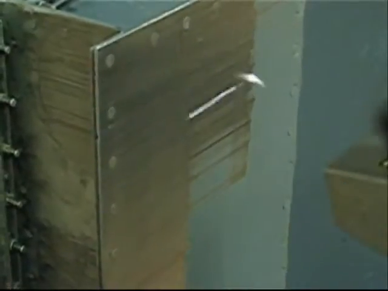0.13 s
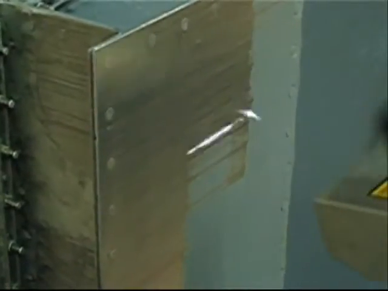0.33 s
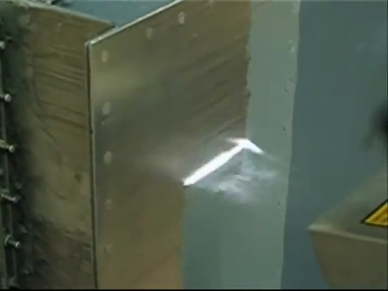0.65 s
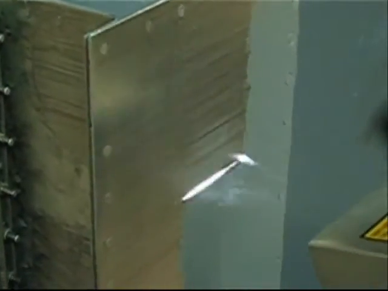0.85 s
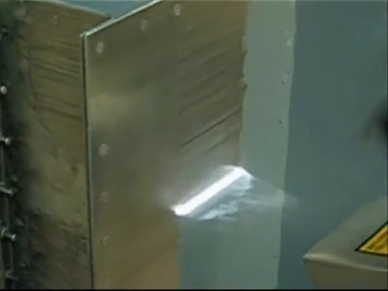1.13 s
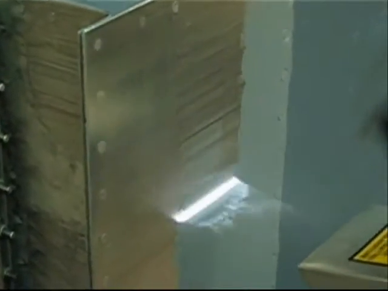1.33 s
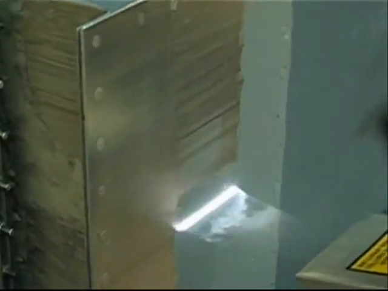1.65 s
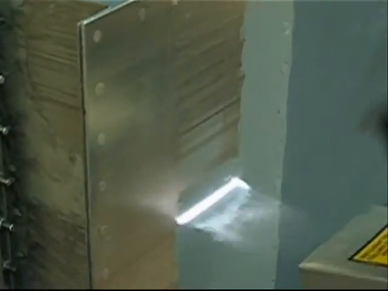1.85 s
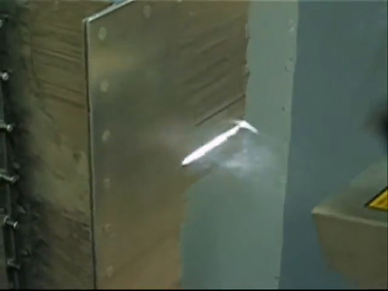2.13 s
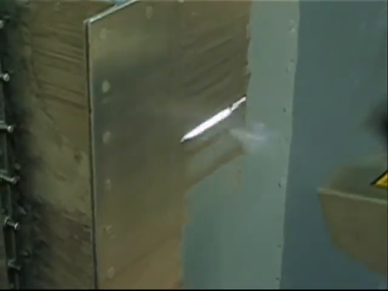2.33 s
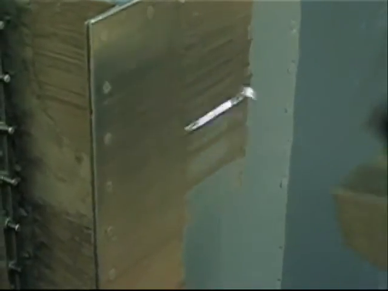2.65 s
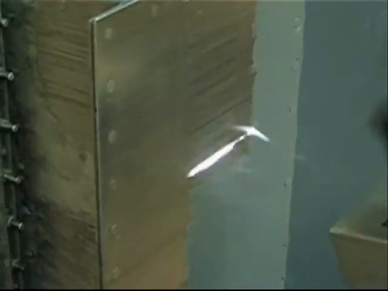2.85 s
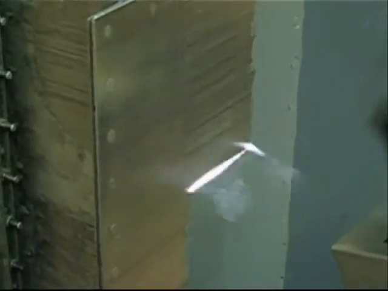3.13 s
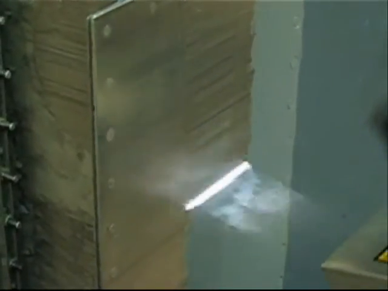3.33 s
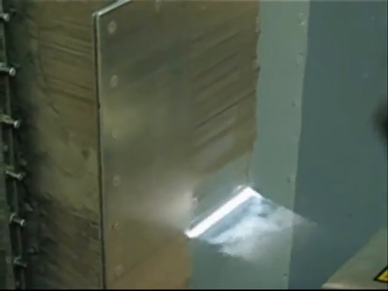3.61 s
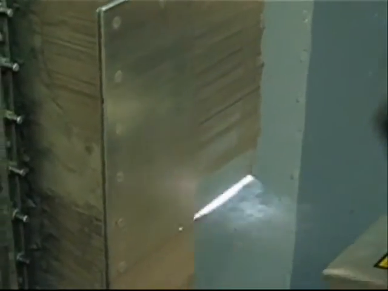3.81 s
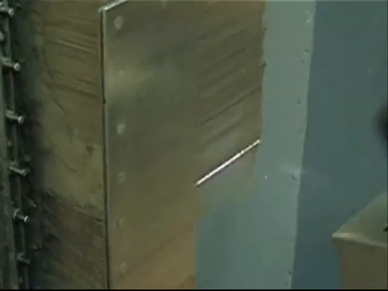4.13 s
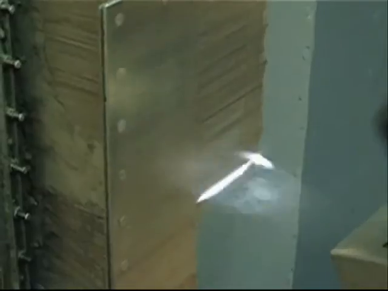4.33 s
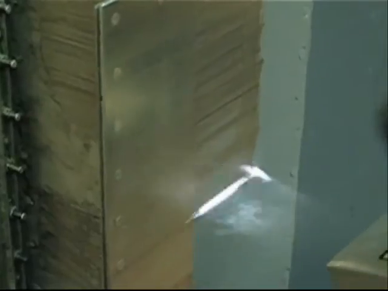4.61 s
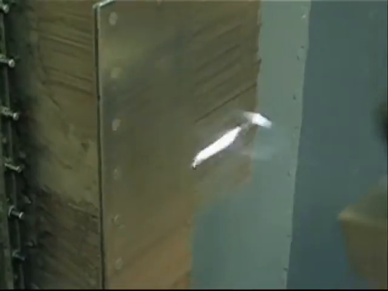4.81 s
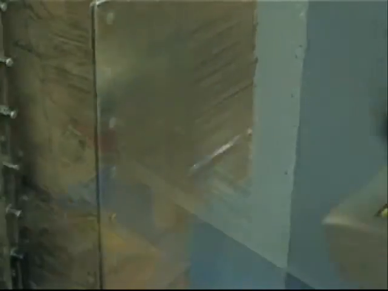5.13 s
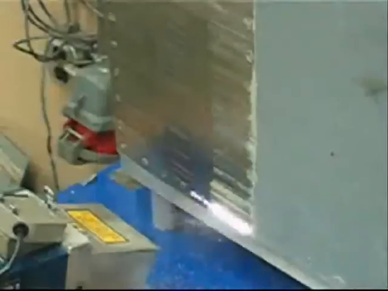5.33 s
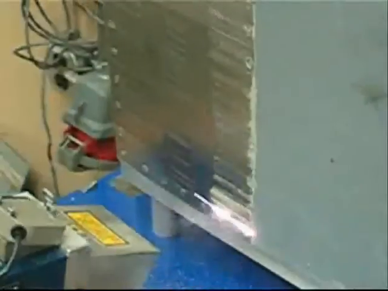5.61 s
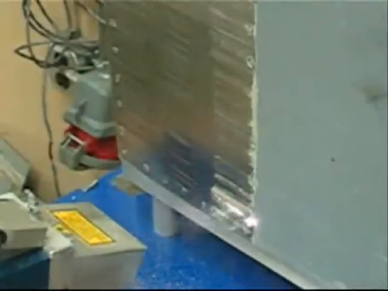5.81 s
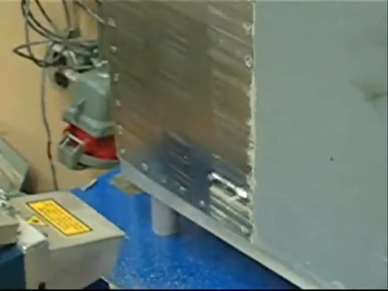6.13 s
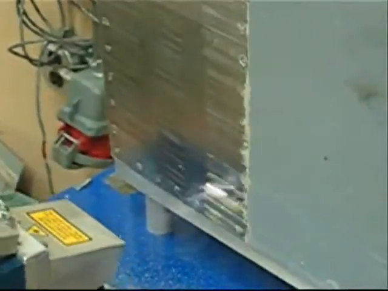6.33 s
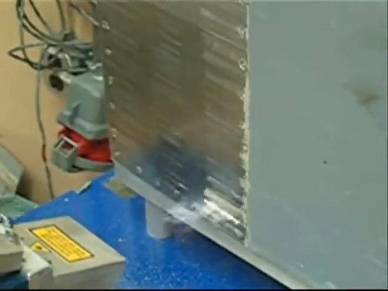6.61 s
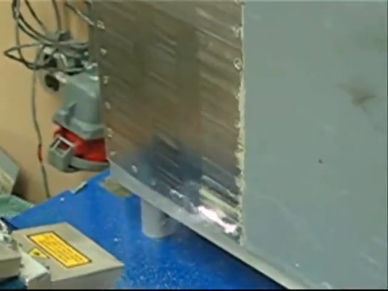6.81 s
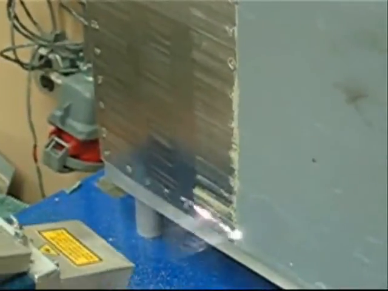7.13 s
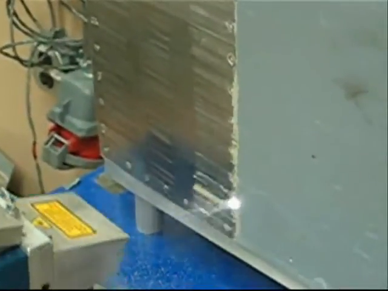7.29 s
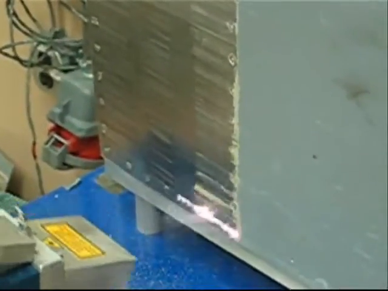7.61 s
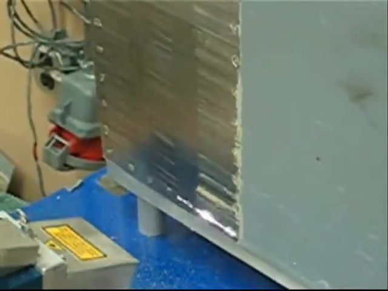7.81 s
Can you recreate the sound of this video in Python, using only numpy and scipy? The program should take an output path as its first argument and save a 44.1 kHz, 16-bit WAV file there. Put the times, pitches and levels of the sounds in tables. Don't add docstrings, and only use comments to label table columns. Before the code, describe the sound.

A fume extractor roars and whistles steadily over a low motor hum while a laser crackles on metal, then wind buffets the microphone.

```python
import sys
import numpy as np
from scipy import signal
from scipy.fft import rfft, irfft, next_fast_len
from scipy.io import wavfile
from scipy.ndimage import uniform_filter1d

SR = 44100
rng = np.random.default_rng(int(sys.argv[2]) if len(sys.argv) > 2 else 0)


def log_audio(samples):
    frames = np.atleast_2d(samples).T
    limited = np.clip(frames, -1, 1)
    pcm = np.round(limited * 32767).astype(np.int16)
    wavfile.write(sys.argv[1], SR, pcm)


def how_loud(loudness_db):
    steps = np.asarray(loudness_db, float) / 20
    return 10 ** steps


N = 351036
SIZE = next_fast_len(N)
HZ = np.maximum(np.fft.rfftfreq(SIZE, 1 / SR), 1)
HOLD = 4
TOP_HZ = SR / HOLD / 2

# t/s, peak level/dB, f/Hz
EDDIES = [(5.508, -14, 299), (5.54, -16, 315), (5.685, -16, 202), (5.725, -12, 202), (5.839, -10.5, 240),
          (5.884, -11.5, 320), (5.96, -15, 215), (6.129, -8.5, 252), (6.208, -12.5, 361), (6.26, -13, 202),
          (6.326, -12.5, 258), (6.382, -22, 323), (6.459, -13, 202), (6.496, -9.5, 258), (6.558, -15, 304),
          (6.712, -16, 200), (6.767, -16, 285), (6.793, -7, 303), (6.976, -8.5, 320), (7.041, -15, 223),
          (7.09, -12, 240), (7.14, -9, 264), (7.297, -12, 263), (7.36, -17, 217.2), (7.523, -12, 439.6),
          (7.742, -12, 199), (7.779, -17, 237), (7.816, -20, 210), (7.85, -15, 250), (7.923, -14, 320)]


def rms_one(x):
    return x / np.sqrt(np.mean(x ** 2) + 1e-20)


def in_time(rows):
    s, *columns = np.transpose(rows)
    return [np.interp(np.arange(N) / SR, s, c) for c in columns]


def bumps(s, rise_s, fall_s):
    t = np.arange(N) / SR - s[:, None]
    width_s = np.where(t < 0, rise_s[:, None], fall_s[:, None])
    return np.exp(-(t / width_s) ** 2)


def drift(rate):
    r = np.exp(-80 * np.pi * rate / SR)
    noise = rng.standard_normal(N // 40 + 2002)
    slow = signal.lfilter([1], [1, -2 * r, r * r], noise)[2000:]
    return np.interp(np.arange(N) / 40, np.arange(len(slow)), rms_one(slow))


def colour(points, resonances=()):
    hz, db = np.transpose(points)
    level_db = np.interp(np.log(HZ), np.log(hz), db)
    for hz, width, lift_db in resonances:
        level_db = level_db + lift_db * np.exp(-(2 * (HZ - hz) / width) ** 2 / 2)
    return how_loud(level_db) * (HZ < TOP_HZ)


def walls(echo_db, decay_s):
    echoes = rng.standard_normal(SR // 4) * np.exp(-np.arange(SR // 4) / (decay_s * SR))
    return np.abs(1 + how_loud(echo_db) * rfft(echoes / np.linalg.norm(echoes), SIZE))


def turbulence(gain, shared_db, own_db, shared_rate, own_rate, count=14):
    spectrum = rfft(rng.standard_normal(SIZE)) * gain
    together = drift(shared_rate)
    place = np.clip(2 * np.log2(HZ / 60), 0, count - 1)
    out = 0
    for k in range(count):
        overlap = np.maximum(1 - np.abs(place - k), 0)
        band = irfft(spectrum * overlap, SIZE)[:N]
        out = out + band * how_loud(shared_db * together + own_db * drift(own_rate))
    return rms_one(out)


def whistle(modes, flutter_db):
    gain = sum(how_loud(level_db) / (1 + (2 * (HZ - hz) / width) ** 2) for hz, width, level_db in modes)
    note = irfft(rfft(rng.standard_normal(SIZE)) * gain, SIZE)[:N]
    return rms_one(note * how_loud(flutter_db * drift(3.1)))


def beam(jitter_s, spread_db, ring_db, ring_s, sizzle_db, sizzle_s):
    # f/Hz, level/dB per Hz
    tick_colour = [(400, -30), (700, 4), (1400, -2), (2100, 0.5), (3900, -7.5), (5400, -7)]
    sweep_hz = 140.03
    count = int(N / SR * sweep_hz) - 1
    chance = rng.standard_normal((count, 2))
    s = np.arange(count) / sweep_hz + .002 + jitter_s * chance[:, 0]
    at = np.clip((s * SR).astype(int), 0, N - 1)
    snaps = np.zeros(N)
    snaps[at] = how_loud(spread_db * (chance[:, 1] + drift(1.8)[at]))
    panel = rng.standard_normal(2000) * np.exp(-np.arange(2000) / (ring_s * SR))
    ring = signal.fftconvolve(snaps, panel)[:N]
    sizzle = signal.lfilter([1], [1, -np.exp(-1 / (sizzle_s * SR))], snaps) * rng.standard_normal(N)
    sweep = rms_one(snaps) + how_loud(ring_db) * rms_one(ring) + how_loud(sizzle_db) * rms_one(sizzle)
    return rms_one(irfft(rfft(sweep, SIZE) * colour(tick_colour), SIZE)[:N])


def motor(wobble_db):
    # f/Hz, level/dB
    tones = [(120.05, 0.0), (240.1, -15.0)]
    t = np.arange(N) / SR
    hum = sum(how_loud(db + wobble_db * drift(11.0)) * np.sin(2 * np.pi * hz * t) for hz, db in tones)
    return np.sqrt(2) * hum


def first_position():
    # f/Hz, level/dB per Hz
    air = [(12, -30), (20, -17), (34, -19), (54, -18), (117, -17), (141, -12.5), (174, -17.5), (253, -17.5),
           (415, -19.5), (712, -16), (1170, -17), (1310, -23.5), (1580, -30.5), (2050, -23.5), (5500, -35),
           (7150, -71), (12100, -120)]
    # f/Hz, width/Hz, lift/dB (below zero: a dip)
    hose = [(78, 15, 3), (243, 18, 6), (280, 30, 3), (608, 35, 5), (702, 18, 5), (748, 30, 4), (810, 15, 4),
            (870, 15, 4), (940, 15, 5), (985, 45, -5), (1077, 34, 5), (1135, 25, -4), (1228, 20, 5),
            (1385, 15, -4), (1800, 70, 4), (1870, 45, -5), (1965, 35, 3), (2105, 50, 4), (2245, 40, 2),
            (2380, 50, 4), (2520, 40, 3), (2850, 150, -3), (3060, 60, 2), (3210, 80, 3), (3420, 120, -2),
            (4620, 100, 2)]
    # f/Hz, width/Hz, level/dB
    nozzle = [(1319.6, 65, 7.5), (1257, 22, -0.5), (1335, 19, 1)]
    # t/s, lift/dB (below zero: a dip), rise/s, fall/s
    swells = [(0.0, -1, .1, .1), (0.23, 1.5, .1, .07), (0.46, 3.5, 0.25, 0.28), (1.07, 1.5, 0.056, 0.07),
              (1.37, -1.5, 0.2, 0.058), (2.7, 4, 0.19, 0.2), (3.27, 2.5, .16, 0.082),
              (3.9, -1.5, 0.15, 0.067), (4.1, 0.8, .06, .06), (4.39, 3, 0.11, .07),
              (4.68, 0.5, 0.096, 0.054), (5.25, 1, 0.19, 0.39)]
    # t/s, level/dB
    bite = [
        (0.0, -41),
        (0.3, -45),
        (0.75, -42),
        (1.5, -57),
        (2.1, -41),
        (2.7, -51),
        (3.5, -41),
        (4.2, -43),
        (4.8, -46.5),
        (5.4, -46),
    ]
    s, lift_db, rise_s, fall_s = np.transpose(swells)
    swell_db = lift_db @ bumps(s, rise_s, fall_s)
    tick_db = in_time(bite)[0] + 5.0
    gain = colour(air, hose) * walls(echo_db=-11.0, decay_s=.03)
    roar = turbulence(gain, shared_db=-0.1, own_db=.5, shared_rate=14.0, own_rate=10.0)
    ticks = beam(jitter_s=.00003, spread_db=2.5, ring_db=6.0, ring_s=.008, sizzle_db=6.0, sizzle_s=.0007)
    hum = motor(wobble_db=0.9)
    note = whistle(nozzle, flutter_db=-1.0)
    return (how_loud(-26.5 + swell_db) * roar + how_loud(-33.0 + 1.47 * swell_db) * note
            + how_loud(-30 + 0.73 * swell_db) * hum + how_loud(tick_db) * ticks)


def second_position():
    # f/Hz, level/dB per Hz
    air = [(240, -6.5), (400, -13.5), (581, -8.5), (700, -10.5), (772, -5), (910, -5.5), (1120, -6.5),
           (1240, 0), (1320, -8), (1400, -15), (1740, -18.5), (1980, -10.5), (3040, -9.5), (3590, -18),
           (5500, -20.5), (7150, -57), (12100, -120)]
    # f/Hz, width/Hz, lift/dB (below zero: a dip)
    hose = [(760, 30, 2), (805, 25, 3), (915, 50, -3), (1075, 25, 3), (1125, 25, -5), (1495, 30, 2),
            (1810, 30, 3), (1865, 35, -3), (1945, 40, 2), (2280, 30, -3), (2345, 40, 3), (2790, 50, 3),
            (2865, 50, -2), (3065, 70, 3), (3135, 40, 4), (3300, 130, 2), (3505, 30, 2), (3590, 90, -2),
            (3880, 80, 4)]
    # f/Hz, width/Hz, level/dB
    nozzle = [(1181, 21, -2), (1244, 130, -4.5), (1286, 34, -5.5)]
    # t/s, length/s, airflow change/dB, whistle change/dB
    surges = [(5.58, .06, 1, -13), (5.686, 0.053, 3, -5), (6.047, 0.04, -2, -1), (5.85, .08, 0, -1.5),
              (6.327, .1, 1, 5.5), (6.507, 0.085, 0, 0), (6.65, 0.051, 3, 4), (6.87, 0.068, 0.5, 4),
              (7.0, .06, 3, -3), (7.2, 0.026, -1, -10), (7.27, 0.12, 2, 3), (7.677, 0.092, 3.5, 0.5),
              (7.505, 0.043, 2.3, 3), (7.923, 0.06, 1.2, 3)]
    s, length_s, air_db, whistle_db = np.transpose(surges)
    shape = bumps(s, length_s, length_s)
    gain = colour(air, hose) * walls(echo_db=-13.0, decay_s=.03)
    roar = turbulence(gain, shared_db=0.78, own_db=-0.54, shared_rate=23.0, own_rate=12.0)
    note = whistle(nozzle, flutter_db=0.5)
    return how_loud(-23.5 + air_db @ shape) * roar + how_loud(-29.0 + whistle_db @ shape) * note


def puffs(cycles, spread):
    out = np.zeros(N + SR)
    chance = rng.random((len(EDDIES), 2))
    for (s, peak_db, hz), (turn, stretch) in zip(EDDIES, chance):
        t = np.arange(int(SR * cycles * (1 + spread * stretch) / hz)) / SR
        push = np.hanning(len(t)) * np.sin(2 * np.pi * (hz * t + turn))
        at = int(s * SR)
        out[at:at + len(t)] += how_loud(peak_db + 2.0) * push
    return out[:N]


def stirring():
    stir, quiet_db, length_s = .7, -19.0, 0.03
    s, peak_db, _ = np.transpose(EDDIES)
    kicks = np.zeros(N)
    kicks[(s * SR).astype(int)] = stir * np.maximum(peak_db - quiet_db, 0)
    return signal.fftconvolve(kicks, np.hanning(int(length_s * SR)))[:N]


def buffeting(limit):
    # f/Hz, level/dB per Hz
    wind = [(7.1, -10), (12, -10), (22, -8), (64, -3.5), (162, -4), (573, -15.5), (699, -20), (779, -19),
            (900, -30), (1170, -40), (1980, -120)]
    # t/s, strength/dB, quickness/dB (flaps over lumps)
    gusts = [
        (5.25, -30, 7),
        (5.42, -29.5, 3),
        (5.55, -20, 0.8),
        (5.75, -24.5, -3),
        (6.05, -20, -3),
        (6.25, -20.5, 3.5),
        (6.62, -21.5, -2),
        (7.0, -20.5, 0),
        (7.96, -22, 1.8),
    ]
    gust_db, quick_db = in_time(gusts)
    lump_db = gust_db - quick_db / 2 + 2.5
    flap_db = gust_db + quick_db / 2 + stirring() - 2.0
    upper = 1 / (1 + (126 / HZ) ** 4)
    lump_gain = colour(wind) * np.sqrt(1 - upper)
    flap_gain = colour(wind) * np.sqrt(upper)
    lumps = turbulence(lump_gain, shared_db=1.4, own_db=1.1, shared_rate=20.0, own_rate=15.0, count=4)
    flaps = turbulence(flap_gain, shared_db=1.75, own_db=2.3, shared_rate=51.0, own_rate=45.0, count=8)
    arrived = np.clip((np.arange(N) / SR - gusts[0][0]) / .24, 0, 1)
    push = arrived * (how_loud(lump_db) * lumps + how_loud(flap_db) * flaps) + puffs(cycles=1.5, spread=.6)
    return limit * np.tanh(push / limit)


def scene():
    # t/s, share of the second position
    move = [
        (5.22, 0.038),
        (5.36, 0.18),
        (5.52, 0.59),
    ]
    share = np.clip(in_time(move)[0], 0, 1)
    mix = (1 - share) * first_position() + share * second_position() + buffeting(limit=.7)
    return mix[None]


def thin_treble(x):
    # f/Hz, threshold/dB under the momentary loudness
    faint = [(8800, -85.0), (9200, -67.0), (9600, -66.5), (10500, -67.3), (11500, -67.3), (12350, -66.0),
             (12450, -62.5), (12620, -62.0), (12800, -59.5), (12850, -20.0)]
    hz, s, frames = signal.stft(x, SR, nperseg=2048, noverlap=1024)
    power = np.abs(frames) ** 2
    loudness = uniform_filter1d(power.sum(axis=1, keepdims=True), size=9, axis=2) ** .4
    wander_db = 1.1 * drift(2.0)[np.minimum((s * SR).astype(int), N - 1)]
    threshold_db = np.interp(hz, *np.transpose(faint))[:, None] + wander_db
    threshold = how_loud(threshold_db) ** 2 * loudness
    patches = uniform_filter1d(uniform_filter1d(power, size=5, axis=1), size=2, axis=2)
    kept = patches > threshold
    coarse = .3 * np.clip(hz / 4000, 0, 1)[:, None]
    blur = rng.standard_normal(frames.shape) + 1j * rng.standard_normal(frames.shape)
    thinned = frames * kept * (1 + coarse * blur)
    return signal.istft(thinned, SR, nperseg=2048, noverlap=1024)[1][:, :N]


def band_limit(x):
    return signal.sosfilt(signal.butter(12, 13300, fs=SR, output="sos"), x)


def record(dry):
    held = np.repeat(dry[:, ::HOLD], HOLD, axis=1)[:, :N]
    mix = thin_treble(held) + .0549
    return band_limit(mix)


dry = scene()
out = record(dry)
log_audio(out)
```